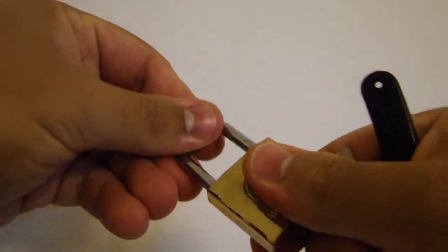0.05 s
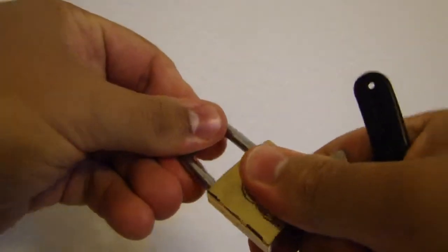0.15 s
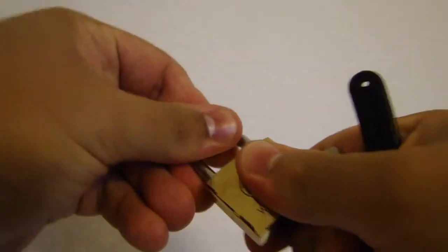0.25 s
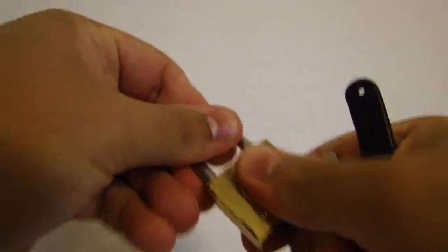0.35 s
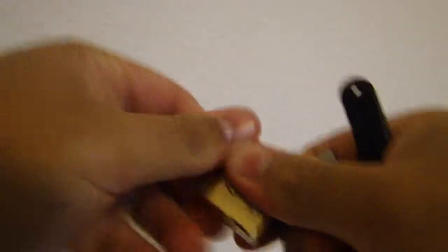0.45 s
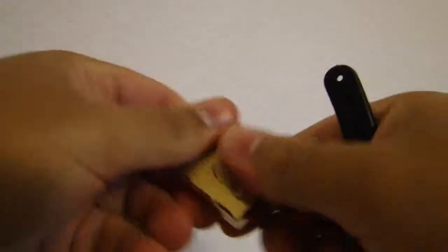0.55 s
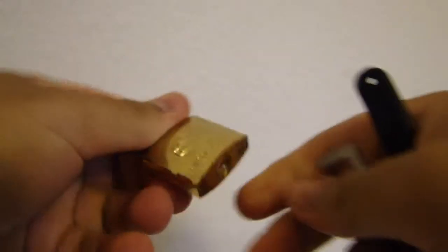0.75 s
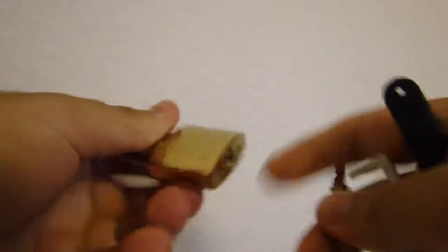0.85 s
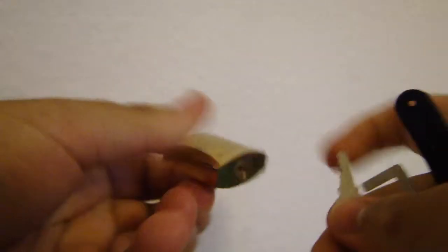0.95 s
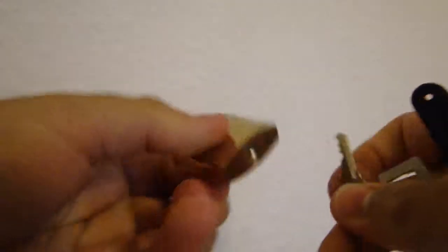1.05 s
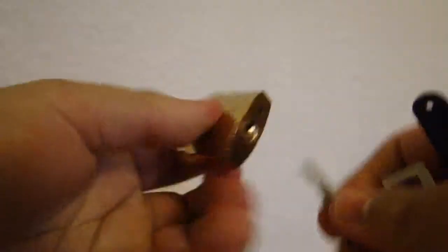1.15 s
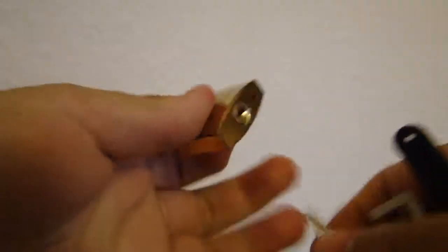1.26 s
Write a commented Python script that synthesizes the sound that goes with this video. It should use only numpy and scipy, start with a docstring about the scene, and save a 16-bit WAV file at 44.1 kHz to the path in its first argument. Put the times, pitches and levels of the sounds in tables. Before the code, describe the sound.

A padlock snaps shut: at about 0.2 s, four metal strikes within a hundredth of a second make one loud, bright, dry click, with a near-wall echo and short room tail. Fingers rub softly around it. Much weaker ticks follow at 0.39, 0.43, 0.47 and 0.62 s. Steady hiss and a faint fan hum continue, with a soft low swell near 1.05 s, until 1.3 s.

```python
"""A padlock clicks shut

A brass padlock is pushed shut in the hands in a quiet room: the shackle strikes, rattles, the bolt snaps in and
small ticks follow. Each contact is a bunch of fast-fading sine tones, a crack of noise and a low shove.
A near wall sends one echo and the room a short tail of fading noise. Shaped noise makes the rubbing hands,
a low swelling noise and the hiss of air and microphones; unsteady sine tones make a fan humming far off.
"""
import sys
import numpy as np
from scipy import signal
from scipy.fft import rfft, irfft, next_fast_len
from scipy.io import wavfile
from scipy.ndimage import map_coordinates

SR = 44100
rng = np.random.default_rng(int(sys.argv[2]) if len(sys.argv) > 2 else 0)


def to_wav(s):
    """Save 16-bit WAV."""
    ch = np.atleast_2d(s).T  # columns
    pcm = np.round(np.clip(ch, -1, 1) * 32767)  # PCM
    wavfile.write(sys.argv[1], SR, pcm.astype(np.int16))


N = 57330  # samples, 1.3 s


def amp(db):
    """Turn decibels into a plain gain."""
    return 10 ** (np.asarray(db) / 20)


def unit(x):
    """Scale a sound to an rms of 1."""
    return x / np.sqrt(np.mean(x ** 2) + 1e-20)


def along(points, hz):
    """Read a (f/Hz, value) table at any frequency, on a log axis."""
    f, value = np.transpose(points)
    return np.interp(np.log(hz + 1), np.log(f + 1), value)


def curve(rows):
    """Turn (t/s, value) rows into one value per sample."""
    return np.interp(np.arange(N) / SR, *np.transpose(rows))


def wobble(rate):
    """Draw a smooth random curve through a given number of random points a second."""
    points = rng.standard_normal(int(N * rate / SR) + 4)
    return map_coordinates(points, [np.arange(N) * rate / SR])


def delay(f, seconds):
    """Phase turn at each frequency that makes a sound come later."""
    return np.exp(-2j * np.pi * f * seconds)


def filtered(x, response):
    """Multiply the spectrum of x by a response, which may be complex."""
    size = next_fast_len(N + SR // 2)
    f = np.fft.rfftfreq(size, 1 / SR)
    return irfft(rfft(x, size) * response(f), size)[..., :N]


def spread(pair, alike):
    """Mix two unrelated signals into left and right with a given likeness."""
    angle = np.arccos(np.clip(alike, -1, 1)) / 2
    mid, side = np.cos(angle) * pair[0], np.sin(angle) * pair[1]
    return np.array([mid + side, mid - side])


def hollow(level, body, alike, lumpy_db, rate):
    """Noise through a few low resonances, made lumpy at random, follows a level curve."""
    def peaks(f):
        return sum(amp(db) / (1 + (2 * (f - centre) / width) ** 2) for centre, width, db in body)

    noise = filtered(spread(rng.standard_normal((2, N)), alike), peaks)
    return unit(noise * amp(lumpy_db * wobble(rate))) * amp(curve(level))


# Tone colour of the hiss: f/Hz, relative level/dB
HISS_COLOUR = [(15, -84.5), (25, -45.5), (182, -8), (219, -7), (250, -5), (286, -5.5), (436, -0.5),
               (473, -4.5), (539, -2), (1070, -7.5), (1260, -5.5), (1360, -9), (1680, -8), (10500, -28),
               (14000, -41.5)]
# How alike left and right are in the hiss: f/Hz, likeness from -1 to 1
HISS_ALIKE = [(60, -0.16), (180, -0.59), (520, -0.66), (1550, -0.5), (4590, -0.25), (13600, 0.4)]
HISS_DB, LEFT_MINUS_RIGHT_DB = -48.5, -1.04


def hiss():
    """Room air and microphone noise: steady random noise, a little unsteady in level."""
    def mid_and_side(f):
        angle = np.arccos(np.clip(along(HISS_ALIKE, f), -1, 1)) / 2
        return amp(along(HISS_COLOUR, f)) * [np.cos(angle), np.sin(angle)]

    mid, side = filtered(rng.standard_normal((2, N)), mid_and_side)
    return unit(np.array([mid + side, mid - side])) * amp(HISS_DB + 1.2 * wobble(4.92))


# Tones of the far fan: f/Hz, level/dB before the common lift
FAN = [(996, -70), (1308, -67.5), (544, -71)]
FAN_LIFT_DB = 2.5


def fan():
    """A far fan hums: sine tones whose level and phase wander."""
    t = np.arange(N) / SR
    hum = np.zeros(N)
    for hz, db in FAN:
        level = amp(db + FAN_LIFT_DB + 3 * wobble(12.36))
        hum += level * np.sin(2 * np.pi * hz * t + 1.0 * wobble(16.35))
    return hum


def air():
    """Hiss and fan together, with the right side slightly louder."""
    return (hiss() + fan()) * amp([[LEFT_MINUS_RIGHT_DB / 2], [-LEFT_MINUS_RIGHT_DB / 2]])


# Rise and fall of the low noise: t/s, level/dB
SWELL_LEVEL = [(0.5, -72.5), (0.696, -62.5), (0.712, -61), (0.75, -98), (0.798, -73), (0.854, -86),
               (1.056, -51.5), (1.082, -58), (1.3, -60)]
# Resonances of the low noise: f/Hz, width/Hz, relative level/dB
SWELL_BODY = [(331, 100, -0.5), (450, 55, -14)]


def low_swell():
    """A low noise swells and sinks: random noise through two resonances."""
    return hollow(SWELL_LEVEL, SWELL_BODY, alike=0.7, lumpy_db=4, rate=43)


# Hands shifting on the lock: t/s, level/dB
RUB_LEVEL = [(0, -55), (.12, -65), (.15, -48), (.185, -42.5), (.24, -45.5), (.3, -55.5), (.37, -55.5),
             (.4, -45.5), (.44, -54), (.5, -54.5), (.6, -73), (1.3, -57)]
# Resonances of the rubbing: f/Hz, width/Hz, relative level/dB
RUB_RESONANCES = [(471, 73, 6), (588, 103, -1.5), (869, 310, -1.5)]


def hands():
    """Skin rubs on the lock: lumpy noise through low resonances, the same on both sides."""
    return hollow(RUB_LEVEL, RUB_RESONANCES, alike=1.0, lumpy_db=5.0, rate=60)


# Strength of the wall's echo: f/Hz, level/dB
WALL = [(500, -16), (2600, -18), (5000, -18), (8000, -17), (10500, -10)]
WALL_DELAY_S = .0065


def wall(near):
    """A near wall sends the sound back once, weaker and later."""
    return filtered(near, lambda f: amp(along(WALL, f)) * delay(f, WALL_DELAY_S))


# Time the room takes to fade by 60 dB: f/Hz, t/s
ROOM_FADE = [(300, 0.26), (1000, 0.22), (2700, 0.46), (4500, 0.37), (8000, 0.3), (12000, .27)]
# Strength of the room's tail: f/Hz, level/dB
ROOM_COLOUR = [(120, -37), (300, -8.5), (1000, -4), (2700, -12), (4500, -6), (8000, -5), (12000, -9.5)]
ROOM_LIKENESS = 0.103  # between left and right


def room(scattered):
    """Many mixed reflections act like a burst of noise that fades at its own speed per frequency."""
    hz, t, grid = signal.stft(rng.standard_normal((2, SR // 2)), SR, nperseg=256)
    fade = amp(-60 * t / along(ROOM_FADE, hz)[:, None])
    tail = signal.istft(grid * fade, SR, nperseg=256)[1]
    tail = spread(tail / np.linalg.norm(tail[0]), ROOM_LIKENESS)
    wet = signal.fftconvolve(scattered[None], tail, axes=1)[:, :N]
    return filtered(wet, lambda f: amp(along(ROOM_COLOUR, f)))


# Metal contacts, with the row at .208 s giving the near wall's echo of the first knock, strong near 2.6 kHz:
# t/s, then six levels/dB, one for each band below, then rise time/ms
HITS = [(.2019, -30, -8, -22, -22, -12, -21, 1.0), (.2059, -32, -17, -18, -18, -14, -17, .7),
        (.2080, -36, -13, -28, -28, -26, -26, .9), (.2129, -10, -11, -9, -13, -13, -6, .7),
        (.3879, -43, -30, -46, -31, -45, -47, .3), (.4225, -66, -48, -62, -50, -60, -62, .6),
        (.4300, -64, -40, -48, -47, -50, -50, .5), (.4680, -75, -66, -62, -62, -60, -49, .5),
        (.6150, -75, -47, -64, -64, -66, -68, .5)]
# Bands of the contact levels: f/Hz (the first level also holds for everything below)
HIT_BANDS = [1700, 2600, 4200, 5400, 7500, 10500]
# Ringing tones of the hand-damped lock: f/Hz, level/dB on top of the contact's, time to fade by 60 dB t/s
LOCK_TONES = [(518, -9, 0.0159), (1033, 8.5, 0.005), (1728, 2.5, 0.011), (2520, -4, 0.011),
              (2740, 5.5, 0.0083), (4620, -33.5, 0.32), (4165, 4, 0.01), (5150, 4.5, 0.0068),
              (6645, 5.5, 0.008), (7490, -4.5, 0.011), (8000, 10.5, 0.0046), (9450, 3, 0.0073),
              (10450, 5, 0.0083), (11810, -1.5, 0.011)]
# Left minus right of the ringing: f/Hz, level/dB
LOCK_LEFT = [(500, -.5), (2600, -4.5), (4500, -1), (8000, -.5), (12000, -2)]
SCATTER_DB = 1.5  # typical random change of each tone's level
PORT_PHASE = 1.2  # radians, typical random phase gap between left and right at 6 kHz
CRACK_DB, CRACK_FADE_S = -3, .006  # the fade is the time to drop 60 dB
PUSH_DB, PUSH_S = -18.5, 0.00035  # on top of the contact's lowest band
BLOW_DB, ROOM_START_S = 25.5, 0.0017  # level and delay of the blow sent to the room


def ring(colour, rise, t, side):
    """One side of the lock's ringing: each way the metal can shake is a fading sine tone."""
    hz, db, fade_s = np.transpose(LOCK_TONES)[:, :, None]
    level_chance, phase_chance, gap_chance = side[1]
    level = along(colour, hz) + db + SCATTER_DB * level_chance - 60 * t / fade_s
    gap = side[0] * PORT_PHASE * hz / 6000 * gap_chance
    tones = np.sin(2 * np.pi * hz * t + .5 * phase_chance + gap)
    return rise * (amp(level + side[0] * along(LOCK_LEFT, hz)) * tones).sum(0)


def crack(colour, rise, t, f):
    """Metal grates for a moment: a very short burst of noise in the contact's colour."""
    pair = spread(rng.standard_normal((2, len(t))), .4)
    noise = irfft(rfft(pair) * amp(along(colour, f)) * f / (f + 600))  # less bass
    return amp(CRACK_DB - 60 * t / CRACK_FADE_S) * rise * noise


def push(low_db, t):
    """The knock shoves the air mostly one way, with a weaker swing back."""
    x = t / PUSH_S
    return amp(low_db + PUSH_DB) * x * np.exp(1 - x) * (1 - x / 2.77)


def padlock():
    """Each contact rings, cracks and shoves; a bare blow of the same colour goes to the room."""
    near, blows = np.zeros((2, N + SR)), np.zeros(N + SR)
    t = np.arange(SR // 5) / SR
    f = np.fft.rfftfreq(len(t), 1 / SR)
    for start, *band_db, rise_ms in HITS:
        at = slice(round(start * SR), round(start * SR) + len(t))
        colour = list(zip(HIT_BANDS, band_db))
        rise = np.sin(np.pi / 2 * np.clip(t * 1000 / rise_ms, 0, 1)) ** 2
        chance = rng.standard_normal((3, len(LOCK_TONES), 1))  # shared by both sides
        near[:, at] += crack(colour, rise, t, f) + push(band_db[0], t)
        blows[at] += irfft(amp(along(colour, f) + BLOW_DB) * delay(f, ROOM_START_S))
        for channel, half in enumerate((.5, -.5)):
            near[channel, at] += ring(colour, rise, t, (half, chance))
    return near[:, :N], blows[:N]


RING_TO_ROOM_DB = -13


def scene():
    """The blow spreads all round and feeds the room more than the near sound does."""
    near, blows = padlock()
    to_room = blows + amp(RING_TO_ROOM_DB) * near.mean(0)
    return air() + low_swell() + hands() + wall(near) + room(to_room) + near


CEILING, ROLL_OFF_HZ, TOP_HZ = .8, 12800, 14200


def record(dry):
    """The input rounds off the highest peaks, dulls the top treble and drops all above a limit."""
    soft = dry / (1 + np.abs(dry / CEILING) ** 6) ** (1 / 6)
    return filtered(soft, lambda f: (f < TOP_HZ) / (1 + (f / ROLL_OFF_HZ) ** 60))


dry = scene()
out = record(dry)
to_wav(out)
```